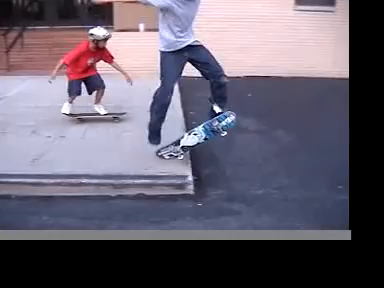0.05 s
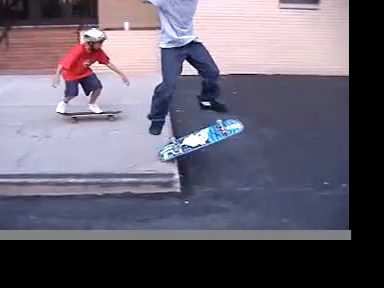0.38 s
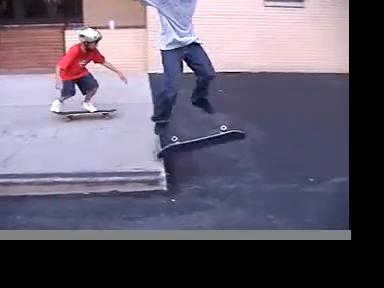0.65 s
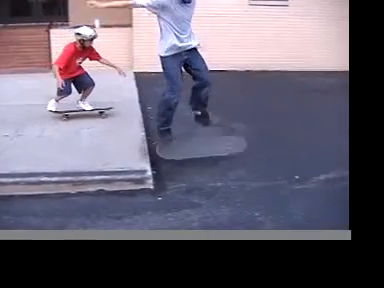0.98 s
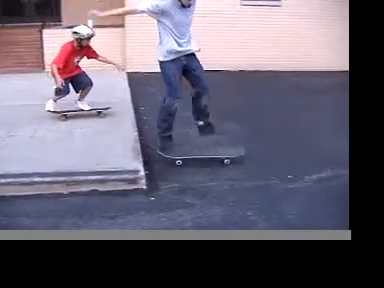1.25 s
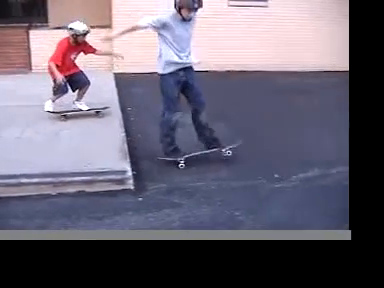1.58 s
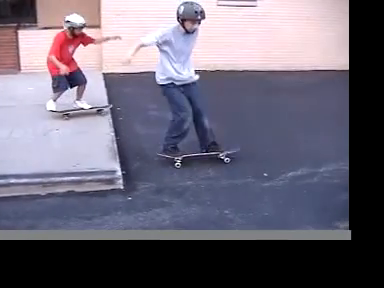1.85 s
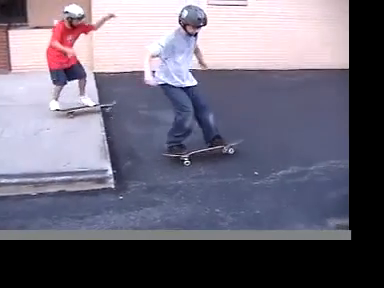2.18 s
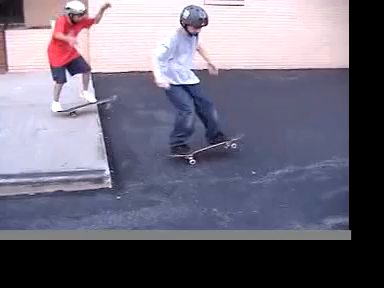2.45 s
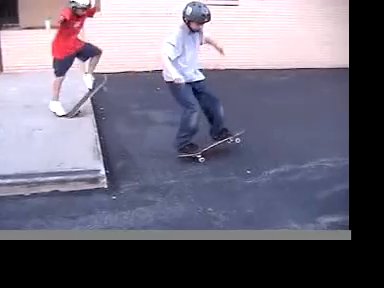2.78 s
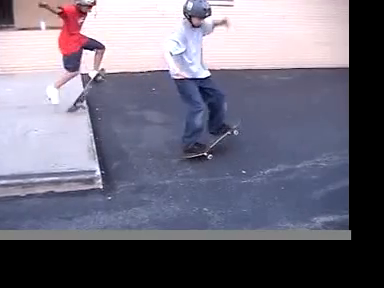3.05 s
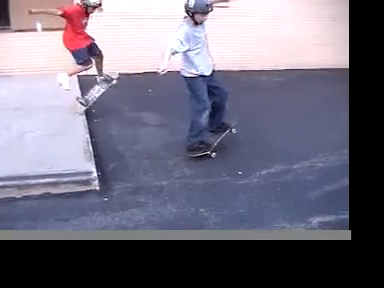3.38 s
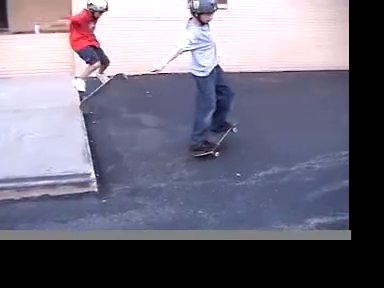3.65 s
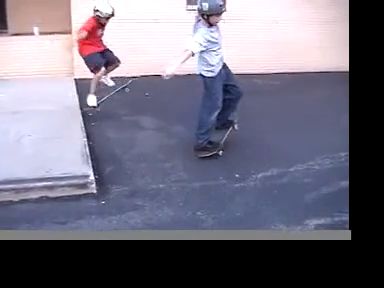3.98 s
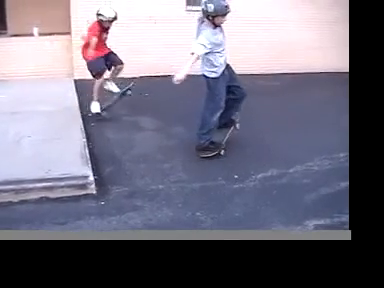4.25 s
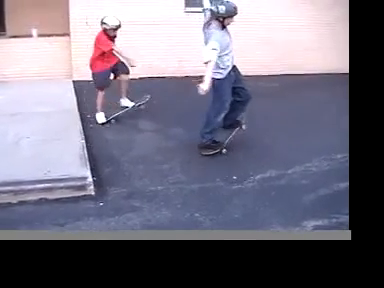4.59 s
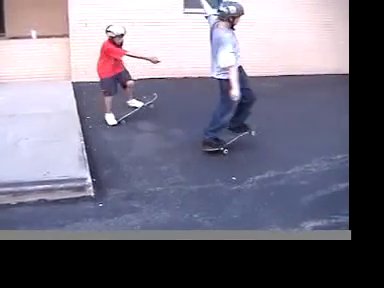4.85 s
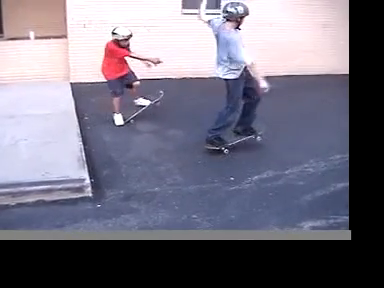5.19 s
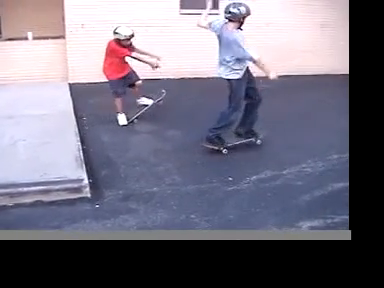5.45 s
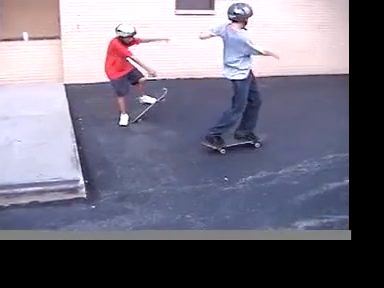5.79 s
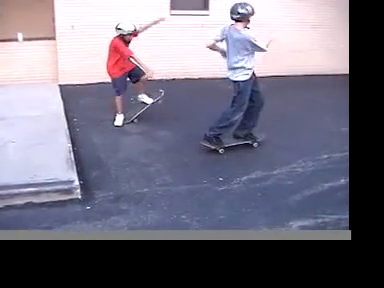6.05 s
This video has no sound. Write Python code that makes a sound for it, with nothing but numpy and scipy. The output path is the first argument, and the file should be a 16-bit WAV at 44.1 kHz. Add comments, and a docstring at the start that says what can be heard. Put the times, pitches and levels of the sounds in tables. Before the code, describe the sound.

Two skateboards in slow motion land with deep, drawn-out clatters and rumble over rough asphalt, with a long, dull echo.

```python
"""Two skateboards in slow motion

In a paved lot beside a brick wall, everything sounds deep and drawn out. One board pops off a ledge,
lands with a clatter and rolls on over rough asphalt; the second follows, lands and drags its tail.
Each hit makes the wooden deck ring, and small stones shake the wheels. The wall throws back a long,
dull echo, an insect chirps far away, and the sound cuts out for an instant."""
import sys
import numpy as np
from scipy import signal
from scipy.fft import rfft, irfft, next_fast_len
from scipy.io import wavfile

SR = 44100
rng = np.random.default_rng(int(sys.argv[2]) if len(sys.argv) > 2 else 0)


def wav_out(sig):
    """Save sig, one row per channel (or a flat mono array), as 16-bit PCM at SR to the path in sys.argv[1]."""
    wavfile.write(sys.argv[1], SR, np.round(np.clip(np.atleast_2d(sig).T, -1, 1) * 32767).astype(np.int16))


N = 269186

# The short tones in a crack of wood. Each row: pitch in Hz, relative level in dB, ring time in seconds.
CRACK_MODES = [(706, -12.5, 0.0044), (860, 18, 0.0075), (1106, 2, 0.016), (1325, 17, 0.005),
               (1594, 6.5, 0.018), (1820, 10, 0.025), (2030, -6, 0.023), (2620, 3, 0.035)]


def from_db(db):
    """Turn decibels into a number to multiply by."""
    return 10 ** (np.asarray(db) / 20)


def unit_power(x):
    """Scale a sound so its average power is 1."""
    return x / np.sqrt(np.mean(x ** 2) + 1e-20)


def seconds():
    """The time of every sample."""
    return np.arange(N) / SR


def swell(start, end, fade_s):
    """Rise around the start, hold, fall around the end."""
    t = seconds()
    return np.clip(np.minimum(t - start, end - t) / fade_s + .5, 0, 1)


def drift(per_s):
    """A curve that wanders from one random value to the next."""
    values = rng.standard_normal(int(N / SR * per_s) + 2)
    return unit_power(np.interp(seconds() * per_s, np.arange(len(values)), values))


def coloured(x, curve):
    """Shape bass and treble by a curve of (Hz, dB) points, falling 48 dB an octave past its ends."""
    hz, db = np.transpose(curve)
    size = next_fast_len(x.shape[-1] + 4096)
    octave, known = np.log2(np.fft.rfftfreq(size, 1 / SR) + 1), np.log2(hz)
    outside = np.abs(octave - np.clip(octave, known[0], known[-1]))
    gain = from_db(np.interp(octave, known, db) - 48 * outside)
    return irfft(rfft(x, size) * gain, size)[..., :x.shape[-1]]


def spread(pair):
    """Two unrelated sounds become left and right: alike in the bass, wider in the treble."""
    # Stereo width. Each row: frequency in Hz, relative level of the sides in dB.
    width = [(60, -10), (150, -10.5), (380, -14.5), (950, -6), (2380, 0.5), (5980, 0), (15000, -19)]
    return pair[0] + from_db(-2.5) * coloured(pair[1], width) * np.array([[1], [-1]])


def panned(x, pan_db):
    """Move a sound to the left (positive) or right (negative)."""
    return x * from_db(np.array([[.5], [-.5]]) * pan_db)


def add(out, start_s, sound):
    """Mix a sound in at a given time."""
    span = out[:, int(start_s * SR):][:, :sound.shape[1]]
    span += sound[:, :span.shape[1]]


def ring(force, modes, centre_hz=None, focus_db=14.5):
    """A push rings the board's natural tones (modes); those near centre_hz, if given, are favoured."""
    hz, db, ring_s = np.transpose(modes)
    level_chance, pitch_chance = rng.standard_normal((2, len(hz)))
    db = db + 1.8 * level_chance
    if centre_hz:
        db = db - focus_db * np.log2(hz / centre_hz) ** 2
    gains = from_db(db) / np.linalg.norm(from_db(db))
    decays = from_db(-60 / (ring_s * SR))  # a tone falls 60 dB in its ring time
    angles = 2 * np.pi * hz / SR * (1 + .02 * pitch_chance)
    tones = sum(gain * signal.lfilter([0, np.sin(w)], [1, -2 * r * np.cos(w), r * r], force + 1e-18)
                for gain, r, w in zip(gains, decays, angles))
    band_hz = [1.03 * hz[0], min(1.046 * hz[-1], SR / 3)]
    return signal.sosfilt(signal.butter(2, band_hz, "band", fs=SR, output="sos"), tones)


def distant_air(level_db):
    """The low, steady rumble of the outdoors."""
    # The tone of the air. Each row: frequency in Hz, relative level in dB.
    curve = [(25, -11.5), (65, 3.5), (100, -11), (138, 4.5), (200, -2), (300, -4.5), (500, -17),
             (900, -24.5), (1500, -25), (2500, -38.5), (4400, -44.5), (5200, -49)]
    return from_db(level_db) * unit_power(coloured(spread(rng.standard_normal((2, N))), curve))


def insect(hz, steady_db, every_s=.177, chirp_s=.08):
    """A distant insect holds one thin note that swells into evenly paced chirps."""
    # Runs of chirps. Each row: first chirp in seconds, end in seconds, level in dB.
    bouts = [(0.415, 1.35, -69.5), (3.586, 4.3, -75.5)]
    chirps = sum(from_db(db) * swell(s - chirp_s / 2, s + chirp_s / 2, fade_s=0.027)
                 for first, end, db in bouts for s in np.arange(first, end, every_s))
    level = (chirps + from_db(steady_db)) * from_db(1.3 * drift(per_s=11))
    return level * np.sin(2 * np.pi * hz * seconds())


def wall_echo(x, ring_s, treble_ring_s, level_db, build_s):
    """Wall and pavement throw back a blurred echo whose treble dies first."""
    # The tone of the echo. Each row: frequency in Hz, level in dB.
    curve = [(50, -10), (140, -13.5), (280, -1.5), (500, -1), (900, 3), (1500, -1.5), (2500, 5.5),
             (4500, -16)]
    age = np.arange(2 * SR) / SR
    noise = coloured(spread(rng.standard_normal((2, len(age)))), curve)
    low = signal.sosfiltfilt(signal.butter(2, 1300, fs=SR, output="sos"), noise)
    echo = low * from_db(-60 * age / ring_s) + (noise - low) * from_db(-60 * age / treble_ring_s)
    echo *= np.clip(age / build_s, 0, 1) ** 2 / np.sqrt(SR)
    return from_db(level_db) * signal.fftconvolve(x, echo, axes=1)[:, :N]


def stones(per_s, spread_db):
    """Wheels meet stones at random: many small ones, a few large."""
    sizes = from_db(spread_db * np.minimum(rng.exponential(1, (2, N)), 4))
    signs = rng.choice([-1, 1], (2, N))
    struck = rng.random((2, N)) < per_s / SR
    return spread(sizes * signs * struck)


def deck_hum(hz, width_hz, throb_db):
    """While the deck rides on two wheels, bumps keep one of its tones ringing unevenly."""
    # The hum: start and end in seconds, level in dB, fade in seconds.
    hum = (3, 5, -37.5, .5)
    start, end, db, fade_s = hum
    band = signal.butter(2, [hz - width_hz / 2, hz + width_hz / 2], "band", fs=SR, output="sos")
    tone = signal.sosfilt(band, stones(per_s=180, spread_db=4.0))
    return unit_power(tone) * swell(start, end, fade_s) * from_db(db + throb_db * drift(per_s=14))


def ride_levels(touchdown_s=0.013):
    """Rumble, drone, grit and rasp build up as the wheels take weight, then fade as the board slows."""
    # Each row: start in seconds, rumble, drone, grit and rasp in dB, rumble's fade in dB per second.
    rides = [(-0.05, -34.5, -33.5, -30, -47.5, 19), (1.48, -21, -25, -42, -44, 8),
             (1.99, -28, -34, -54, -44, 5.5), (4.6, -22.5, -23, -31.5, -42.5, 11),
             (4.94, -22, -27.5, -36.5, -51, 21.5), (5.909, -26, -27.5, -39.5, -49, 34)]
    fade_ratios = np.array([[1], [1.35], [1.66], [1.25]])  # the other three fade faster than the rumble
    total = 0
    for start, *levels_db, slowing in rides:
        age = np.maximum(seconds() - start, 0)
        gains = from_db(np.array(levels_db)[:, None] - fade_ratios * slowing * age)
        total = np.hypot(total, np.minimum(age / touchdown_s, 1) * gains)
    return total


def rolling(pebble_db=-25, patch_db=2.2):
    """Rough ground shakes the wheels, makes the deck drone and crunches in patches; scrapes rasp."""
    # The tones of the four rolling noises. Each row: frequency in Hz, relative level in dB.
    rumble_curve = [(13, -38), (22, -4), (49, 2), (64, 7), (92, -2), (134, 4), (195, 2.5), (237, -9.5),
                    (260, -28.5), (340, -47), (570, -120)]
    drone_curve = [(140, -27), (230, -7.5), (247, -6.5), (344, -2.5), (599, -14.5), (680, -26.5),
                   (880, -45.5), (1500, -120)]
    grit_curve = [(560, -3), (680, -1), (850, -1.5), (1020, -1.5), (1250, -8.5), (1450, -13.5)]
    rasp_curve = [(1200, -4.5), (1400, -0.5), (1850, 0.5), (2080, -3), (2350, -15.5), (2750, -12.5),
                  (3050, -17), (3650, -26), (4300, -36), (4900, -40)]
    # A tail or sliding wheel scrapes the ground. Each row: start and end in seconds, level in dB.
    scrapes = [(1.578, 1.74, -30.5), (2.111, 2.458, -37), (2.863, 3.394, -41), (4.297, 4.408, -45.5),
               (5.277, 5.726, -41.5), (5.825, 6.03, -45.5)]
    shaking, droning, crunching, rasping = ride_levels()
    scraping = sum(from_db(db) * swell(start, end, fade_s=0.16) for start, end, db in scrapes)
    bumps, patches = drift(per_s=35), drift(per_s=90)
    gravel = stones(per_s=5000, spread_db=2.8)
    rumble = unit_power(coloured(stones(per_s=1200, spread_db=3.0), rumble_curve)) * shaking
    drone = unit_power(coloured(stones(per_s=1200, spread_db=2.5), drone_curve)) * droning
    grit = unit_power(coloured(gravel, grit_curve)) * np.hypot(crunching, from_db(-2) * scraping)
    rasp = unit_power(coloured(gravel, rasp_curve)) * np.hypot(rasping, scraping)
    pebbles = unit_power(ring(stones(per_s=60, spread_db=2.0), CRACK_MODES, centre_hz=1500))
    wheels = panned((rumble + drone) * from_db(1.4 * bumps), pan_db=-2.1)
    crunch = (grit + rasp) * from_db(patch_db * (bumps + patches))
    return wheels + crunch + from_db(pebble_db) * shaking * pebbles


def contact(grains, chatter_s, chatter_db, rattle_db=-12.0, rattle_s=0.43):
    """One hard click, a quick chatter of skidding wheels, then a long faint rattle of loose axles."""
    age = np.arange(grains.shape[1]) / SR
    fade = from_db(-60 * age / chatter_s) + from_db(rattle_db - 60 * age / rattle_s)
    force = grains * fade / np.linalg.norm(fade) * from_db(chatter_db)
    force[:, 0] += 1  # the click
    return force / np.sqrt(1 + from_db(2 * chatter_db) / 2)


def blow(gravel, db, hard_db, weight_db, loose_db, free_tail=False):
    """One hit: the rider's weight thuds, the deck knocks, wood cracks and metal snaps on the ground."""
    # The board's tones. Each row: pitch in Hz, relative level in dB, ring time in seconds.
    thud_modes = [(65.4, -13, 0.17), (138.5, -4, 0.16), (200, -7.5, 0.16)]
    knock_modes = [(269.5, -8, 0.36), (337, -4, 0.19), (395.7, 1, 0.04), (480.6, 9, 0.025), (630, 2, 0.021),
                   (827.6, 2, 0.047)]
    snap_modes = [(2785, -9, 0.035), (3530, 5, 0.019), (3770, 8.5, 0.017), (3970, -3.5, 0.002)]
    tail_modes = [(268, -9.5, 0.29), (780, -5.5, 0.029), (887, -1, 0.05), (966, 1, 0.035)]
    grains = np.take(gravel, rng.integers(N) + np.arange(SR // 4), axis=1, mode="wrap")
    crack_hz = 904 * 2 ** (.02 * hard_db)
    thud = ring(contact(grains, chatter_s=0.11, chatter_db=loose_db + 2.5, rattle_db=-36.5), thud_modes)
    knock = ring(contact(grains, chatter_s=0.095, chatter_db=loose_db + 5, rattle_db=-28.5), knock_modes)
    crack = ring(contact(grains, chatter_s=0.063, chatter_db=loose_db + 10.5), CRACK_MODES, crack_hz)
    snap = ring(contact(grains, chatter_s=0.023, chatter_db=loose_db - 1), snap_modes)
    # A harder hit knocks less, and cracks and snaps more.
    body = from_db(3.27 - 0.24 * hard_db) * knock
    edge = from_db(5 + 0.27 * hard_db) * crack + from_db(-32.5 + 1.26 * hard_db) * snap
    if free_tail:  # with no weight on it, the tail rings hollow: low if touched softly, high if hit hard
        tail_hz = 750 * 2 ** (0.2 * hard_db)
        tap = contact(grains, chatter_s=0.14, chatter_db=-10)
        body = body + from_db(1) * ring(tap, tail_modes, tail_hz, focus_db=3.5)
    clack = panned(body, pan_db=-3) + panned(edge, pan_db=-0.9)
    return from_db(db) * clack + from_db(0.5 + weight_db) * panned(thud, pan_db=-0.5)


def clatter():
    """Pops carry little weight, ticks thud nearly as loud as they click, landings carry the rider, thumps are
    nearly all weight."""
    # A board is popped and flicked on the concrete ledge.
    # Each row: start in seconds, then strength, hardness and chatter in dB.
    pops = [(0.039, -12.5, -5.5, -8.5), (0.079, -22, -18.5, -10), (0.099, -17.5, -7.5, -4),
            (0.182, -20.5, -12, -9.5), (0.229, -24, -3, 7.5), (0.353, -27, -6, 7.5), (2.894, -18, 4, 1),
            (3.134, -18, -0.5, -5.5), (3.17, -20.5, -1.5, 3), (3.237, -25, -9.5, 6)]
    # Deck and wheels come down on the asphalt.
    # Each row: start in seconds, then strength, hardness, rider's weight and chatter in dB.
    landings = [(1.453, -1.5, 14.5, -16, -17), (1.503, -12.5, -2.5, -17, -0.5),
                (1.519, -12, 8.5, -19.5, -2), (1.594, -11.5, 4, -22, -14), (1.635, -13, 0.5, -23.5, -2),
                (1.668, -9, 5, -9.5, -17.5), (1.702, -9, -3.5, -14.5, -2), (1.766, -14.5, -2.5, -32, -3.5),
                (1.829, -13, 2.5, -24.5, -3.5), (1.861, -9, 7, -17.5, -2), (1.996, -16, 4, -14, -0.5),
                (2.022, -20.5, 17, -14.5, 2.5), (2.294, -23, 13.5, -22.5, 6), (4.297, -18, 4.5, -14, 2),
                (4.323, -23, 12.5, -31.5, 7), (4.454, -7.5, 11, -12.5, -17), (4.478, -13.5, 4.5, -13.5, -7),
                (4.543, -14.5, -0.5, -14, 4), (4.619, -8.5, 8.5, -13, -7), (4.68, -17, -13, -27.5, -10.5),
                (4.702, -10, 5, -7, -1.5), (4.849, -11.5, -4.5, -9, 2.5), (4.885, -16, -13.5, -12.5, 4),
                (5.692, -9, -10, -8.5, -8), (5.908, -23, -5, -24, 13)]
    # Loose axles, shoes and pebbles tick. Each row: start in seconds, strength and hardness in dB.
    ticks = [(0.933, -44, 20.5), (2.115, -22.5, 1), (3.34, -31, 6.5), (3.411, -28.5, 3), (3.63, -27.5, 3.5),
             (3.771, -31.5, 6.5), (4.038, -34.5, 16), (4.108, -31.5, 6.5), (4.145, -27.5, -2.5),
             (4.191, -31.5, 10), (4.374, -26, 2), (5.137, -25, -2), (5.751, -23.5, 0)]
    # The rider's weight shifts and thumps through the wheels. Each row: start in seconds, weight in dB.
    thumps = [(2.25, -20), (4.787, -9.5), (5.215, -10), (5.26, -13.5), (5.817, -9.5), (5.865, -10.5),
              (5.921, -12), (5.985, -17)]
    out = np.zeros((2, N))
    gravel = unit_power(stones(per_s=2500, spread_db=4.0))
    for start, db, hard_db, loose_db in pops:
        add(out, start, blow(gravel, db, hard_db, weight_db=db - 13.5, loose_db=loose_db, free_tail=True))
    for start, db, hard_db, weight_db, loose_db in landings:
        add(out, start, blow(gravel, db, hard_db, weight_db, loose_db))
    for start, db, hard_db in ticks:
        add(out, start, blow(gravel, db, hard_db, weight_db=db - 3, loose_db=-3))
    for start, db in thumps:
        add(out, start, blow(gravel, db - 12, hard_db=-4.5, weight_db=db, loose_db=-4))
    return out


def scene():
    """Both boards, their echo, the air and the insect; the first pop lies to the right."""
    hum = deck_hum(hz=352, width_hz=55, throb_db=2.0)
    pan_db = np.interp(seconds(), [0, .5, 1.4], [-4, -1.5, 0])
    boards = panned(clatter() + rolling() + hum, pan_db)
    echo = wall_echo(boards, ring_s=3.06, treble_ring_s=1.21, level_db=-1.5, build_s=.06)
    return boards + echo + distant_air(level_db=-41) + insect(hz=3170, steady_db=-80)


def record(dry, ceiling=.58, treble_hz=4500, hiss_db=-38, steady_hiss_db=-93, cutoff_hz=15850):
    """Peaks are rounded, slow motion dulls the treble, hiss follows the loudness, the sound cuts once."""
    # The tone of the hiss. Each row: frequency in Hz, relative level in dB.
    hiss_curve = [(3000, 1.5), (5000, 2), (8000, 1), (15500, 1)]
    # The brief gap in the sound: start and end in seconds.
    gap = (4.8075, 4.841)
    x = ceiling * np.tanh(dry / ceiling)
    x = signal.sosfilt(signal.cheby1(8, .5, treble_hz, fs=SR, output="sos"), x)
    bright = signal.sosfilt(signal.butter(1, 900, "high", fs=SR, output="sos"), x)
    loudness = np.sqrt(signal.lfilter(*signal.butter(1, 90, fs=SR), bright ** 2))
    hiss = unit_power(coloured(rng.standard_normal((2, N)), hiss_curve))
    x = x + hiss * (from_db(hiss_db) * loudness + from_db(steady_hiss_db))
    off, on = gap
    x = x * np.interp(seconds(), [off, off + .00003, on, on + .002], [1, .002, .002, 1])
    return signal.sosfilt(signal.ellip(10, .1, 80, cutoff_hz, fs=SR, output="sos"), x)


dry = scene()
out = record(dry)
wav_out(out)
```